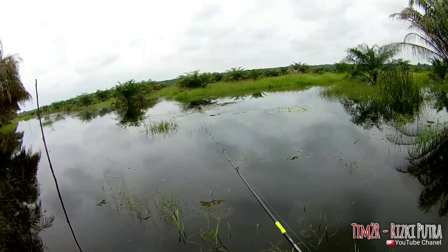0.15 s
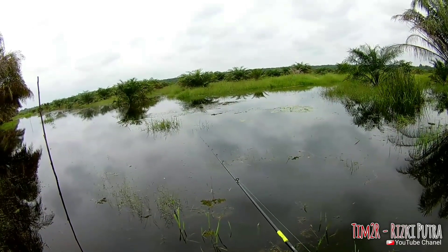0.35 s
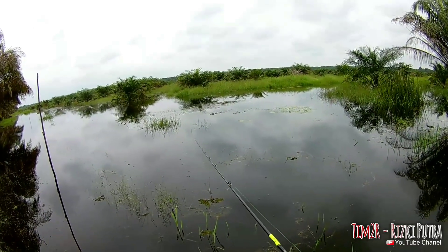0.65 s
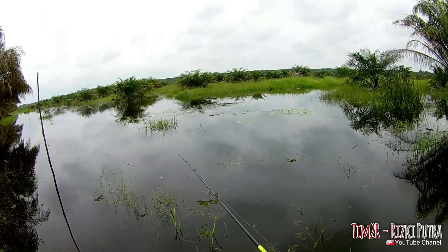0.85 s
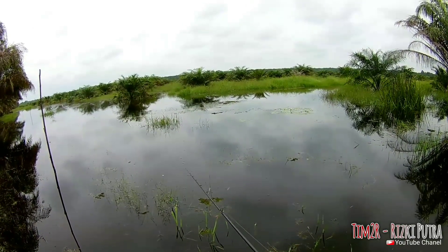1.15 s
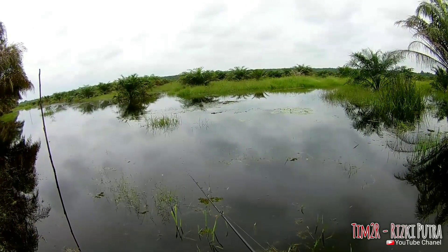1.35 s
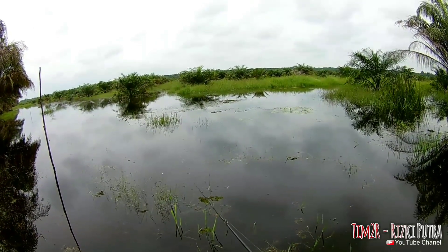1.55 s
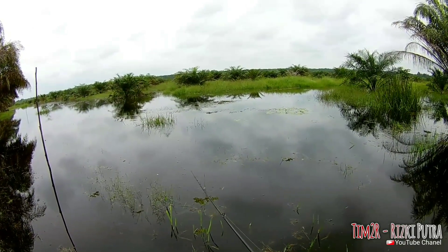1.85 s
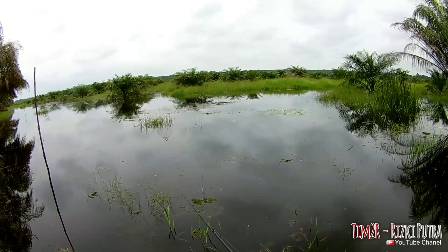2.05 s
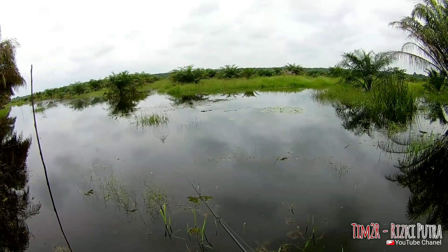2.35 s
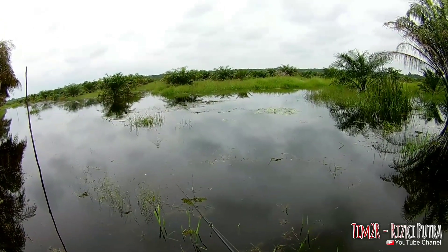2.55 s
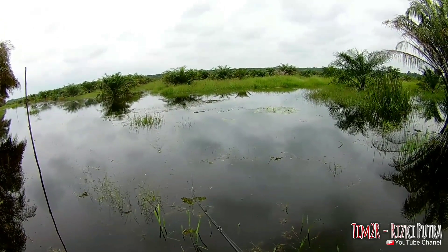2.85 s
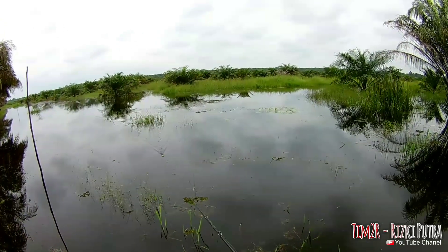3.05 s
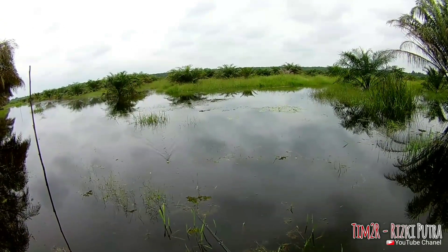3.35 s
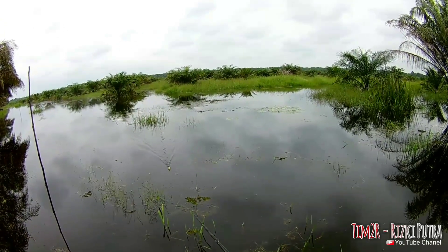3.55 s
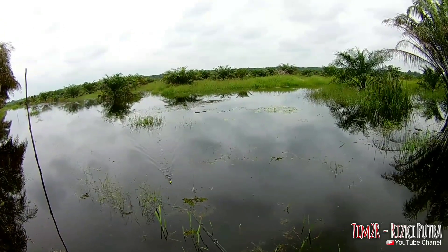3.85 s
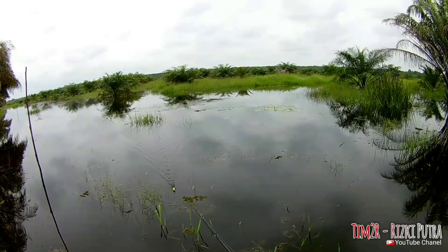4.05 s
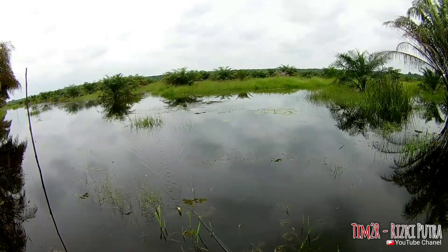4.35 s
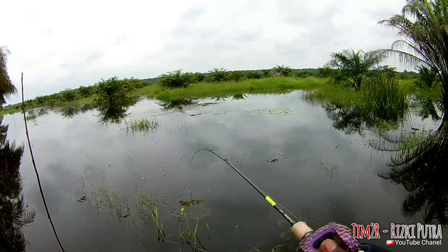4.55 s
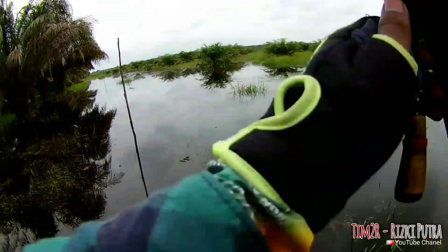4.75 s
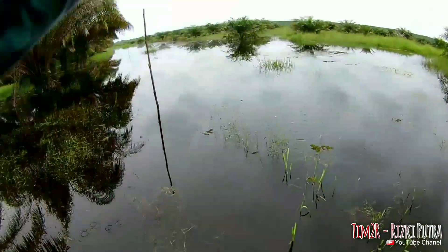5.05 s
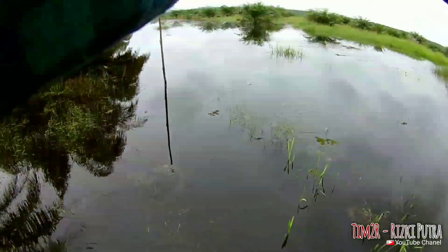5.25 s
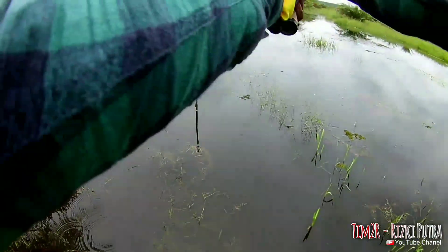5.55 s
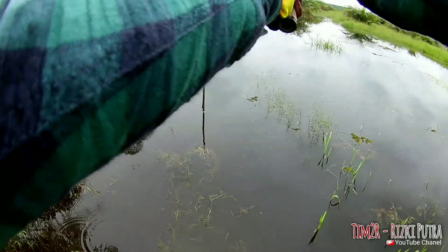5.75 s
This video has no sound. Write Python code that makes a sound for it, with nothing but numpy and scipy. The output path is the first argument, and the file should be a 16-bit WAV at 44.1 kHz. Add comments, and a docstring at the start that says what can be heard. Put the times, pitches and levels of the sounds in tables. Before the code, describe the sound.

Beside a still pond, a fishing reel ticks faintly and unevenly while small bubbles plip over steady open-air hiss and a low wavering hum. Two tiny high insect chirps pass. After a brief total silence, line and glove rubbing grows, then the rod swings with a swish, a low wind thump and a cluster of hard hollow knocks, very close to the microphone. A spool whirr sinks away.

```python
"""By a still pond an angler winds in a lure: the reel's modes tick, its gears purr as resonant noise,
small bubbles ring as gliding sines where the lure wades, an insect chirps twice on a falling note.
A hum of wavering harmonics lies under open-air hiss. After a short silence the rod swings: filtered
noise makes the air swish and the line rub, the reel's body rings as it knocks hard against the hand,
and the spool whirrs down as a sinking sine."""
import sys
import numpy as np
from scipy import signal
from scipy.fft import rfft, irfft, next_fast_len
from scipy.io import wavfile
from scipy.ndimage import uniform_filter1d

SR = 44100
rng = np.random.default_rng(int(sys.argv[2]) if len(sys.argv) > 2 else 0)


def transcribe(signal):
    """Save signal, clipped to [-1, 1], as a 16-bit WAV file at the path in sys.argv[1]."""
    frames = np.atleast_2d(signal).T
    limited = np.clip(frames, -1, 1)
    pcm = np.round(limited * 32767).astype(np.int16)
    wavfile.write(sys.argv[1], SR, pcm)


N = 260447

# line rub resonances: centre_hz, one_pass_width_hz, relative_db
RUB_BANDS = [(275, 150, -25), (500, 200, 11.5), (790, 340, 15), (1253, 115, 5)]
# glove scrape resonances: centre_hz, one_pass_width_hz, relative_db
SCRAPE_BANDS = [(1500, 300, -3), (2025, 300, 4.5), (2590, 600, 0), (3250, 1300, -5)]


def undb(db):
    """Gain of a level in dB."""
    return 10 ** (np.asarray(db) / 20)


def unit(x):
    """Scaled to rms 1."""
    return x / np.sqrt(np.mean(x ** 2))


def noise():
    """White noise over the whole scene."""
    return rng.standard_normal(N)


def curve(time_s, value, edge=-120):
    """Control points interpolated to every sample; edge holds outside their times."""
    return np.interp(np.arange(N) / SR, time_s, value, edge, edge)


def walk(rate_hz):
    """Random levels held 1 / rate_hz and smoothed twice; spread near 1."""
    hold = int(SR / rate_hz)
    steps = np.repeat(rng.standard_normal(N // hold + 1), hold)
    return 1.11 * uniform_filter1d(uniform_filter1d(steps, hold), hold)[:N]


def swells(peaks, rise_db_s, fall_db_s):
    """Gain that climbs to each (s, dB) peak and sinks after it at steady dB/s; peaks add in power."""
    peak_s, peak_db = np.transpose(peaks)[:, :, None]
    t = np.arange(N) / SR - peak_s
    level_db = peak_db + np.minimum(rise_db_s * t, -fall_db_s * t)
    return np.sqrt(np.sum(undb(2 * level_db), axis=0))


def resonant(x, bands):
    """x through parallel resonances, each applied twice for steep skirts; rms 1."""
    out = 0
    for hz, width_hz, db in bands:
        b, a = signal.iirpeak(hz, hz / width_hz, SR)
        once = signal.lfilter(b, a, x)
        out = out + undb(db) * unit(signal.lfilter(b, a, once))
    return unit(out)


def ring(hz, db, t60_s, push_s):
    """Decaying modes after a blow that builds up over push_s; negative hz flips the polarity."""
    t = np.arange(int(SR * np.max(t60_s)))[:, None] / SR
    fade = np.exp(-np.log(1000) * t / t60_s) * (1 - np.exp(-t / push_s)) ** 2
    return np.sum(undb(db) * fade * np.sin(2 * np.pi * hz * t), axis=1)


def add(out, start_s, x):
    """Mix a short sound in at start_s."""
    i = int(start_s * SR)
    out[i:i + len(x)] += x[:N - i]


def air():
    """Open-air hiss in half-octave bands; the lower ones swell and flicker, the top stays nearly smooth."""
    # hiss spectrum before scaling: hz, relative_db_per_hz
    spectrum = [(8.8, -57), (15, 4.5), (38, -1.5), (121, -6), (167, -5), (205, -8.5), (282, -11.5),
                (954, -20.5), (1280, -20.5), (2150, -24), (2870, -29.5), (3960, -31.5), (4990, -34),
                (7940, -39), (15500, -37)]
    # broad bumps on it: centre_hz, width_hz, lift_db
    bumps = [(1240, 300, 3), (2130, 290, 1)]
    size = next_fast_len(N)
    f = np.maximum(np.arange(size // 2 + 1) * SR / size, 1)
    hz, level_db = np.transpose(spectrum)
    db = np.interp(np.log(f), np.log(hz), level_db)
    for centre_hz, width_hz, lift_db in bumps:
        db = db + lift_db * np.exp(-((f - centre_hz) / width_hz) ** 2)
    shaped = rfft(rng.standard_normal(size)) * undb(db)
    out, common_swell = 0, walk(3.3)
    for octave in np.arange(4, 14.6, .5):  # log2 of the band centre in Hz
        share = np.cos(np.pi * np.clip(np.log2(f) - octave, -.5, .5)) ** 2
        unrest = np.clip((13.2 - octave) / 4, .1, 1)
        flicker_db = unrest * (0.57 * common_swell + 1.67 * walk(9))
        out = out + irfft(shaped * share, size)[:N] * undb(flicker_db)
    return undb(-55) * unit(out)


def hum():
    """A low drone whose overtones waver more than its root, and a rumble that throbs twice a cycle."""
    # drone harmonics: multiple, mean_rms_db
    harmonics = [(1, -58), (2, -65), (3, -63.5), (4, -71.5), (5, -70), (6, -71.5), (8, -77)]
    # swells of the throb: peak_s, peak_db
    throbs = [(.2, -57), (1.15, -62), (2.02, -61), (2.85, -56.5), (3.5, -64.5), (4.5, -72), (5.42, -56)]
    root_hz, floor_db, slope_db_s = 29.3, -65, 32
    turn = 2 * np.pi * root_hz * np.arange(N) / SR
    tones = 0
    for k, db in harmonics:
        level = np.sqrt(2) * undb(db + 1.2 * np.sqrt(k) * walk(3.6))
        phase = k * turn + 0.18 * k * walk(3.01) + k * k
        tones = tones + level * np.sin(phase)
    throb = undb(floor_db) + swells(throbs, slope_db_s, slope_db_s)
    puffs = noise() * (1 + 0.94 * np.cos(2 * turn))
    return tones + throb * resonant(puffs, [(164.3, 104, 0)])


def insect():
    """Near: a falling sine that starts sharply, sags and echoes faintly. Far: a narrow flickering hiss."""
    # far insects: time_s, mean_rms_db
    far_levels = [(0, -85), (.3, -81), (2.05, -76), (2.65, -76.5), (2.92, -80.5), (3.9, -76), (4.55, -81.5),
                  (4.9, -86), (5.5, -81), (5.9, -87)]
    # near chirps: start_s, level_db, from_hz, to_hz, length_s
    chirps = [(0.874, -45.5, 10200, 10120, 0.015), (2.728, -54, 9950, 9750, 0.027)]
    far_gain = undb(curve(*np.transpose(far_levels)) + 1.6 * walk(30))
    out = far_gain * resonant(noise(), [(3910, 580, 0), (6770, 1000, -9.5)])
    for start_s, db, from_hz, to_hz, length_s in chirps:
        u = np.linspace(0, 1, int(length_s * SR))
        attack, release = np.minimum(u / .17, 1) ** 2, np.minimum((1 - u) / .17, 1)
        shape = attack * (1 - 0.4 * u) * release
        hz = from_hz + (to_hz - from_hz) * u
        note = undb(db) * shape * np.sin(2 * np.pi * np.cumsum(hz) / SR)
        add(out, start_s, note)
        add(out, start_s + 0.007, undb(-17) * note * (u > .6))  # only the note's end echoes
    return out


def bubbles():
    """Each bubble rings once as a gliding sine, most upward, a few down; many faint ones come at random."""
    # single bubbles, and at 1.99 s a short plop that falls steeply: start_s, level_db, start_hz, t60_s,
    # rise_octaves_s
    single = [(.099, -52, 1200, 0.0091, 5), (.369, -51, 1250, 0.014, 7), (.39, -55, 1226, .05, -3),
              (.758, -45.5, 500, 0.028, 2), (.78, -54.5, 1220, 0.028, -1), (.92, -58.5, 1340, .067, 18),
              (1.026, -50, 464, 0.1, 6.5), (1.097, -50, 950, 0.028, 7), (1.327, -53, 1170, 0.023, 3),
              (1.45, -57, 810, .021, 1), (1.517, -47.5, 870, 0.013, 122), (1.702, -47.5, 537, 0.027, 65),
              (1.735, -58, 1790, .026, -3), (1.736, -54.5, 1190, .036, 11), (1.785, -54, 1066, .02, 3),
              (1.905, -52.5, 540, 0.043, 12), (1.9885, -34.5, 1050, 0.014, -220),
              (2.015, -51.5, 1450, .037, 6), (2.347, -51, 607, 0.046, 24), (2.627, -48.5, 630, .027, -1),
              (2.721, -45.5, 488, .12, 9.5), (2.722, -49.5, 1230, 0.037, 14), (2.795, -57.5, 2700, .01, 20),
              (2.858, -56, 3500, .01, 3), (2.87, -50, 580, 0.064, 10.5), (2.903, -53.5, 1235, 0.035, 15),
              (2.96, -45.5, 2560, 0.012, 4), (3.035, -55, 995, .028, 7), (3.054, -48.5, 2500, 0.0094, 45),
              (3.173, -46.5, 627, .031, 21), (3.175, -52, 1280, .022, 3), (3.37, -58.5, 2240, .032, 4),
              (3.466, -51.5, 1190, .022, 2), (3.48, -62, 2100, .045, 4), (3.497, -55, 955, .03, 0),
              (3.558, -52, 550, 0.044, 8), (3.614, -56, 930, 0.048, 16), (3.65, -52, 1280, 0.017, 6),
              (3.759, -51, 703, 0.044, 25), (3.789, -56, 733, .07, 3), (3.815, -51, 1032, .058, 22.5),
              (4.018, -47.5, 660, 0.04, 63), (4.044, -48, 640, 0.029, 13), (4.168, -54, 1107, 0.063, 6),
              (4.508, -49.5, 975, 0.024, 86)]
    fizz_per_s, fizz_floor_db, fizz_end_s = 160, -67, 4.55
    u = rng.random((int(fizz_per_s * fizz_end_s), 4)).T
    fizz_hz = 480 * 2 ** (2.18 * u[1] ** 1.38)
    fizz_db = fizz_floor_db - 1.6 * np.log(u[2])
    fizz = np.transpose([fizz_end_s * u[0], fizz_db, fizz_hz, 12 / fizz_hz, 20 * u[3] ** 2])
    out = np.zeros(N)
    for start_s, db, start_hz, t60_s, rise in [*single, *fizz]:
        t = np.arange(int(max(t60_s, .005) * 1.8 * SR)) / SR
        fade = np.exp(-np.log(1000) * (t / t60_s) ** 2)  # holds, then drops away
        fade *= 1 - np.exp(-t / 0.00021)
        hz = np.minimum(start_hz * 2 ** (rise * t), 9000)
        add(out, start_s, undb(db) * fade * np.sin(2 * np.pi * np.cumsum(hz) / SR))
    return out


def reel():
    """Each pawl tick rings bright and dull modes, tuned differently every time; the gears purr faintly."""
    # pawl ticks: start_s, bright_db, dull_db
    ticks = [(0.0468, -62, -66), (0.196, -62, -57.5), (0.2644, -69, -66), (0.3405, -56, -54),
             (0.407, -60, -55.5), (0.4718, -65, -66), (0.5974, -61, -56.5), (0.6533, -61, -62),
             (0.713, -61, -61), (0.7825, -63, -60), (0.8463, -60, -65), (0.9612, -65, -66),
             (1.0944, -60, -62.5), (1.1613, -56.5, -58.5), (1.5742, -61, -63), (1.6601, -61, -70),
             (1.8741, -65, -62), (1.949, -61, -64), (2.0108, -62, -66), (2.152, -65, -71),
             (2.3595, -65, -72), (2.4237, -57.5, -62), (2.4913, -63, -62), (2.6269, -67, -68),
             (2.6878, -67, -70), (2.794, -72, -65), (2.837, -64, -65), (2.9133, -64, -68),
             (2.9915, -61, -68), (3.234, -65, -69), (3.3148, -62, -63), (3.3926, -65, -68),
             (3.6974, -67, -63), (3.7653, -64, -67), (3.8323, -61, -60), (3.9, -67, -72), (3.976, -67, -64),
             (4.1026, -60, -71), (4.1789, -60, -62), (4.3934, -64, -66), (4.4598, -65, -65),
             (5.1234, -66, -70)]
    # bright modes: mean_hz, relative_db, t60_s
    bright = [(9700, 2, 0.0084), (8600, -5, 0.0017), (6260, 5, 0.0029), (11000, -12, 0.0018)]
    # dull modes: mean_hz, relative_db, t60_s
    dull = [(4700, 7, .004), (3900, 8, .005), (2800, 8, .005), (1500, 8, .008)]
    # gears under load: peak_s, mean_peak_db
    purrs = [(.72, -67), (3.1, -65), (3.55, -64.5), (4.95, -71), (5.3, -62), (5.5, -59.5)]
    hz, db, t60_s = np.transpose([*bright, *dull])
    sign = (-1) ** np.arange(len(hz))  # alternate polarity
    out = np.zeros(N)
    for start_s, bright_db, dull_db in ticks:
        tuned_hz = sign * hz * (1 + 0.048 * rng.standard_normal(len(hz)))
        tick_db = np.repeat([bright_db, dull_db], [len(bright), len(dull)])
        add(out, start_s, ring(tuned_hz, db + tick_db, t60_s, push_s=.00008))
    purr_gain = swells(purrs, rise_db_s=23, fall_db_s=27.5) * undb(0.43 * walk(30))
    return out + purr_gain * resonant(noise(), [(607, 170, 0)])


def gust():
    """Low resonant noise of wind on the microphone during the swing."""
    # gusts: peak_s, peak_db
    gusts = [(4.88, -59), (5.31, -56.5), (5.39, -39), (5.45, -48), (5.56, -53), (5.72, -71)]
    return resonant(noise(), [(40, 67, 0)]) * swells(gusts, rise_db_s=224, fall_db_s=172)


def swish():
    """Flicks of the rod tip stir the air: flickering band noise with its top cut."""
    # resonances: centre_hz, one_pass_width_hz, relative_db
    swish_bands = [(2800, 1200, -2), (4000, 1300, 0), (5200, 2000, -2), (6600, 2200, -4)]
    # rod tip flicks: peak_s, peak_db before the top cut
    flicks = [(5.3, -79), (5.385, -69), (5.415, -58.5), (5.46, -71), (5.56, -70), (5.63, -70), (5.7, -67)]
    stirred = resonant(noise() * undb(1.5 * walk(56)), swish_bands)
    stirred = stirred * swells(flicks, rise_db_s=600, fall_db_s=103)
    return signal.sosfilt(signal.butter(6, 6700, fs=SR, output="sos"), stirred)


def line_rub():
    """Line and glove rub in grains: one uneven noise through two sets of resonances."""
    # the swing: time_s, rub_rms_db, scrape_rms_db
    strokes = [(4.8, -82, -94), (4.88, -56.5, -68), (5.0, -58.5, -71), (5.1, -54.5, -65),
               (5.19, -49.5, -62.5), (5.3, -46.5, -58.5), (5.36, -46.5, -60), (5.411, -40.5, -45.5),
               (5.51, -53.5, -55.5), (5.65, -71, -61.5), (5.75, -67, -67), (5.9, -86, -78)]
    # short catches of the line: peak_s, peak_db
    scuffs = [(5.48, -36), (5.655, -41.5)]
    time_s, rub_db, scrape_db = np.transpose(strokes)
    rub_gain = undb(curve(time_s, rub_db)) + swells(scuffs, rise_db_s=751, fall_db_s=849)
    grains = noise() * undb(2.0 * walk(90))
    rub = resonant(grains, RUB_BANDS) * rub_gain
    return rub + resonant(grains, SCRAPE_BANDS) * undb(curve(time_s, scrape_db))


def squeak():
    """A part sings at each catch: noise through one narrow resonance."""
    # catches: peak_s, peak_db
    catches = [(5.354, -36.5), (5.4, -44.5), (5.425, -41.5), (5.5, -45)]
    return resonant(noise(), [(782, 30, 0)]) * swells(catches, rise_db_s=1503, fall_db_s=333)


def spool():
    """The spool whirrs down: a flickering sine that sinks in pitch as it fades."""
    start_s, start_hz, slows_oct_s, peak_db = 5.55, 325, 2.1, -51
    hz = start_hz * 2 ** (-slows_oct_s * np.maximum(np.arange(N) / SR - start_s, 0))
    spin = swells([(start_s, peak_db)], rise_db_s=1200, fall_db_s=33) * undb(1.1 * walk(19))
    return np.sqrt(2) * spin * np.sin(2 * np.pi * np.cumsum(hz) / SR)


def reach_db(hz, blow_db, blow_hz, below_db, above_db):
    """Drive of a blow at hz: falls evenly below its centre; above, steeply and then ever less."""
    octaves_below = np.log2(np.maximum(blow_hz / hz, 1))
    octaves_above = np.log2(np.maximum(hz / blow_hz, 1))
    return blow_db - below_db * octaves_below - above_db * octaves_above ** .5


def knocks():
    """Every blow rings the same body, its place deciding which modes answer; loose parts rattle after it."""
    # reel and rod butt modes: hz, relative_db, t60_s
    body = [(185, -32, 0.019), (261.4, 6, 0.046), (396, -10, 0.05), (567, 3, .03), (680, -21, 0.0089),
            (787, 5, 0.014), (904, -0.5, 0.034), (1130, 3, 0.022), (1263, 1.5, 0.013), (1442, 2.5, 0.034),
            (1645, -8, 0.019), (1872, 6, 0.014), (2257, 3, 0.017), (2530, -9, 0.0069), (2880, 10.5, 0.0083),
            (3520, 0, 0.014), (4010, -6.5, 0.024), (4530, -7, 0.013), (5040, -24, 0.0082),
            (5860, -14, .008), (6470, -6.5, 0.011), (9200, -8, .007)]
    # blows: start_s, drive_db, hardest_driven_hz, loss_octave_below_db, loss_octave_above_db
    blows = [(.307, -53, 1250, 6, 14), (.518, -42.5, 1230, 11, 11.5), (5.234, -40, 915, 2.5, 19),
             (5.275, -41, 5040, 18, 17), (5.3402, -32.5, 1250, 3, 24), (5.347, -32.5, 1240, 4, 8.5),
             (5.38, -15.5, 925, 5, 18), (5.3857, -6.5, 1245, 9, 22.5), (5.393, -17, 925, 24, 31),
             (5.42, -40.5, 915, 1, 17), (5.4377, -22.5, 940, 10.5, 18), (5.4621, -24, 1140, 8.5, 13),
             (5.467, -21, 558, 11, 20.5), (5.476, -27.5, 915, 3, 16), (5.488, -36, 915, 3, 4.5),
             (5.523, -12, 1240, 7.5, 23), (5.5262, -10.5, 1230, 1.05, 16), (5.5299, -11.5, 570, 11, 23),
             (5.566, -53, 2200, -1, 8), (5.598, -18.5, 893, 15, 23), (5.639, -31.5, 570, 15, 23),
             (5.65, -41, 1250, 5, 19), (5.662, -37, 570, 20, 17), (5.735, -47.5, 560, 6, 12)]
    rattle_db, rattle_t60_s, rattle_hz = -24.5, 0.074, 1250
    # weak blows are dull: dB lost per octave above soft_hz, for each dB under a hard blow
    soft_hz, softness, hard_db = 2200, .3, -15
    hz, db, t60_s = np.transpose(body)
    out, shake = np.zeros(N), np.zeros(N)
    sign = (-1) ** np.arange(len(hz))  # neighbouring modes move in opposite directions
    t = np.arange(SR // 5) / SR
    settle = np.exp(-np.log(1000) * t / rattle_t60_s) * (1 - np.exp(-t / .0015)) ** 2
    for start_s, *drive in blows:
        blow_db, blow_hz = drive[:2]
        # upper modes vary at random from blow to blow
        scatter_db = 2.0 * rng.standard_normal(len(hz)) * (hz > 1600)
        octaves_up = np.log2(np.maximum(hz / max(soft_hz, blow_hz), 1))
        dull_db = softness * min(blow_db - hard_db, 0) * octaves_up
        mode_db = db + scatter_db + reach_db(hz, *drive) + dull_db
        add(out, start_s, ring(sign * hz, mode_db, t60_s, push_s=0.00058))
        add(shake, start_s, undb(reach_db(rattle_hz, *drive) + rattle_db) * settle)
    loose = noise() * undb(3.0 * walk(170))
    return out + shake * resonant(loose, RUB_BANDS + SCRAPE_BANDS)


def scene():
    """All sources at one microphone."""
    winding = air() + hum() + insect() + bubbles() + reel()
    swing = gust() + swish() + line_rub() + squeak() + spool()
    return (winding + swing + knocks())[None]


def record(dry):
    """The sound fades out and back in around a short silence; the top is cut."""
    # fade around the silence: time_s, gain
    gap = [(4.565, 0.95), (4.598, 0), (4.644, 0), (4.69, 0.57)]
    faded = dry * np.clip(curve(*np.transpose(gap), edge=0.86), 0, 1)
    top_cut = signal.ellip(10, .2, 50, 15550, fs=SR, output="sos")
    return signal.sosfilt(top_cut, faded)


dry = scene()
out = record(dry)
transcribe(out)
```